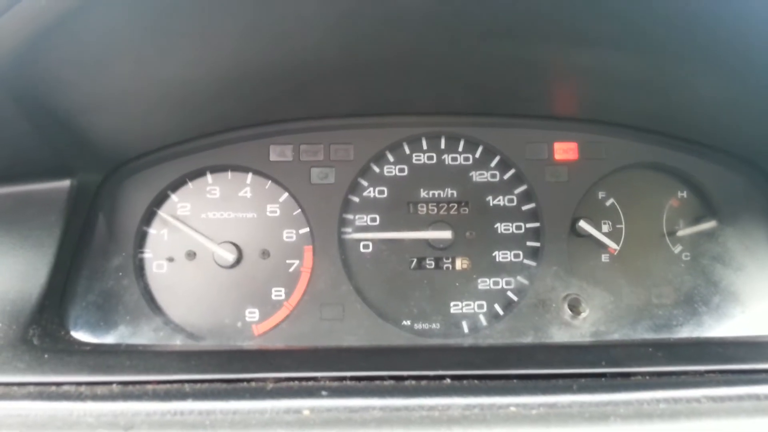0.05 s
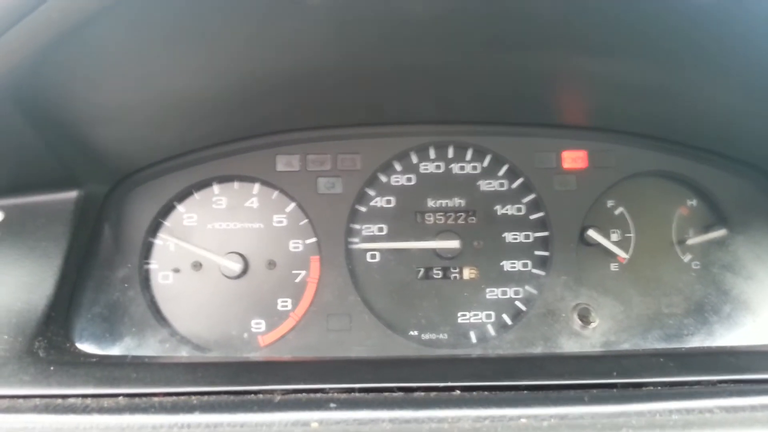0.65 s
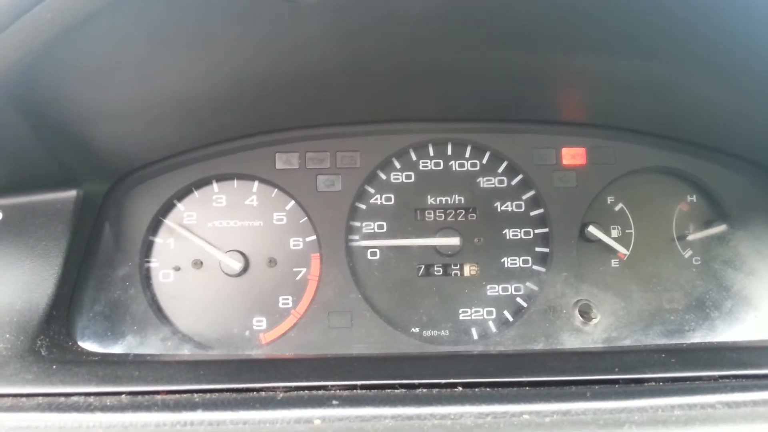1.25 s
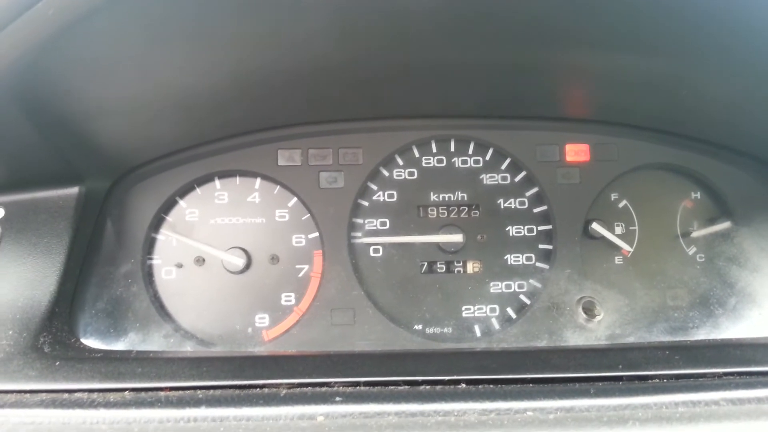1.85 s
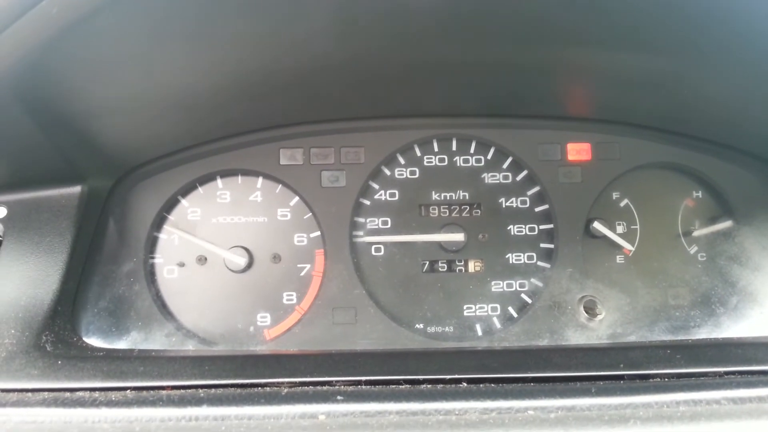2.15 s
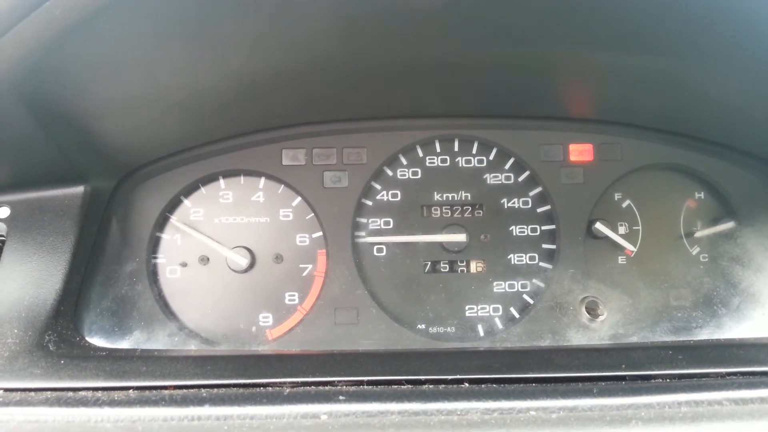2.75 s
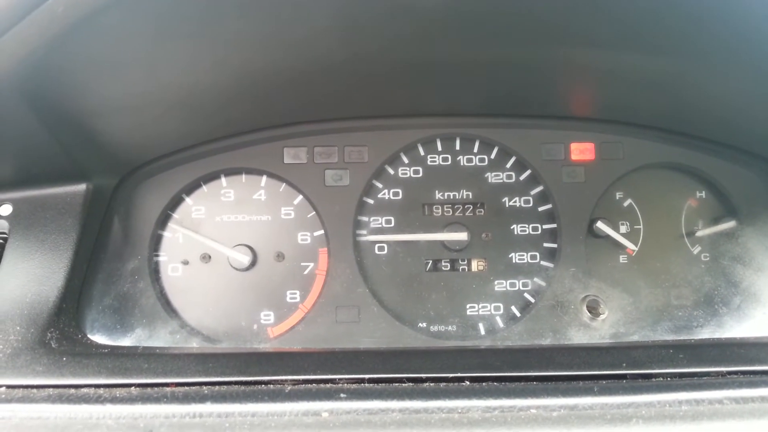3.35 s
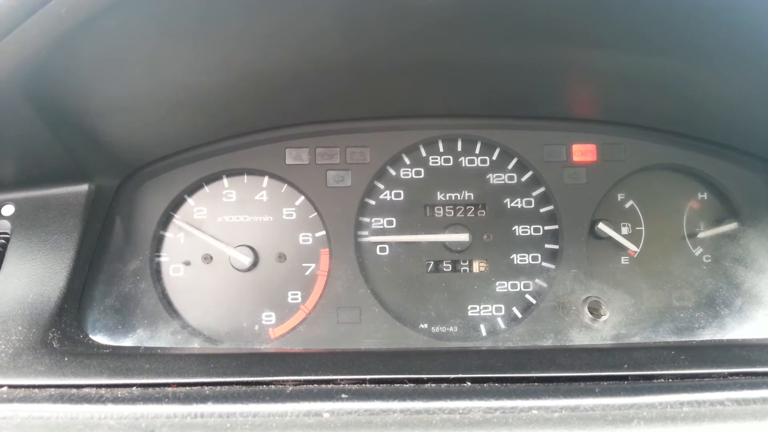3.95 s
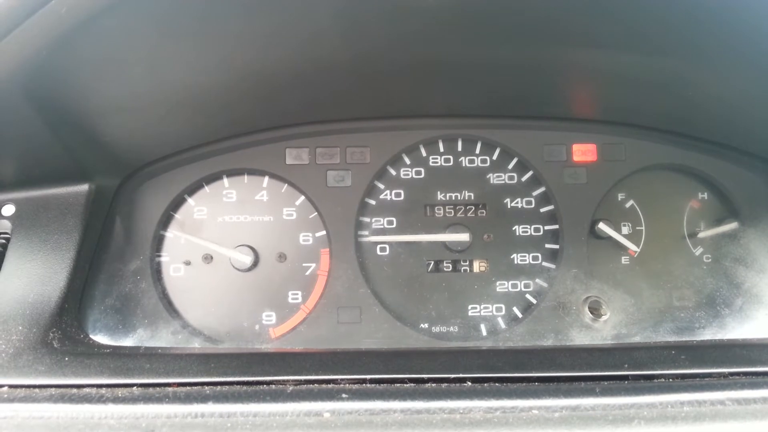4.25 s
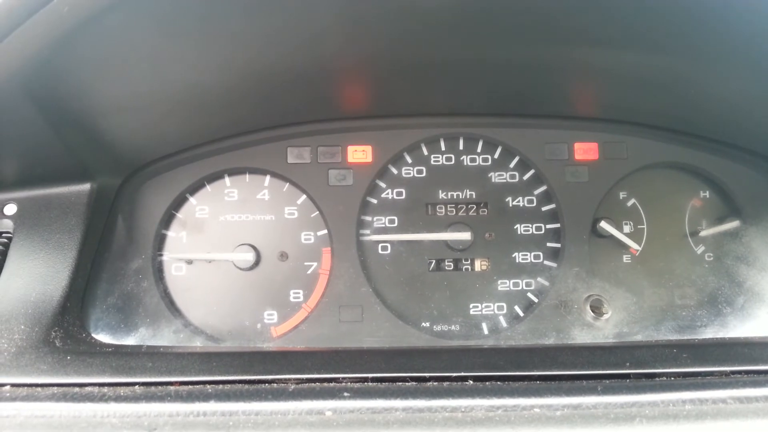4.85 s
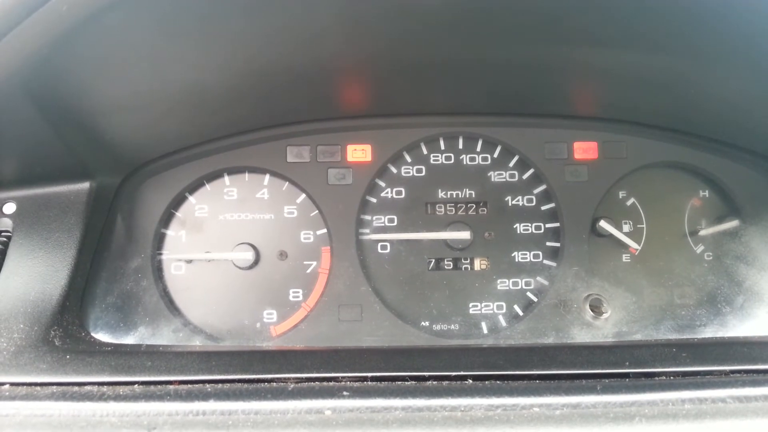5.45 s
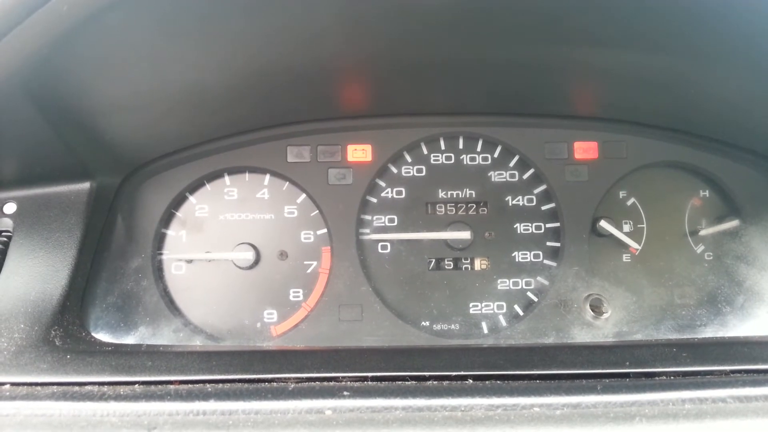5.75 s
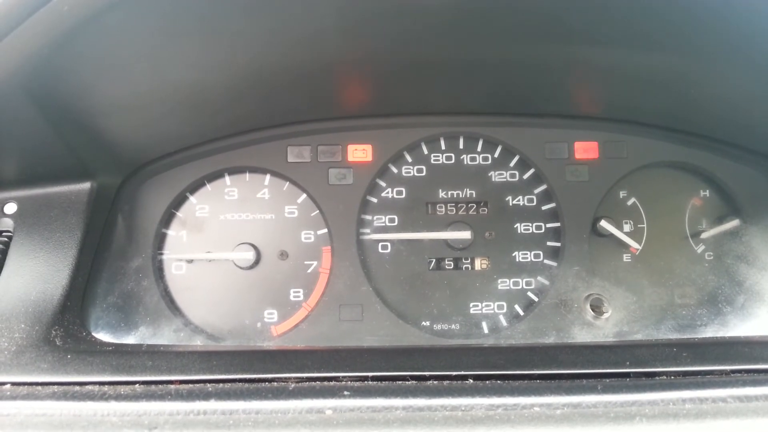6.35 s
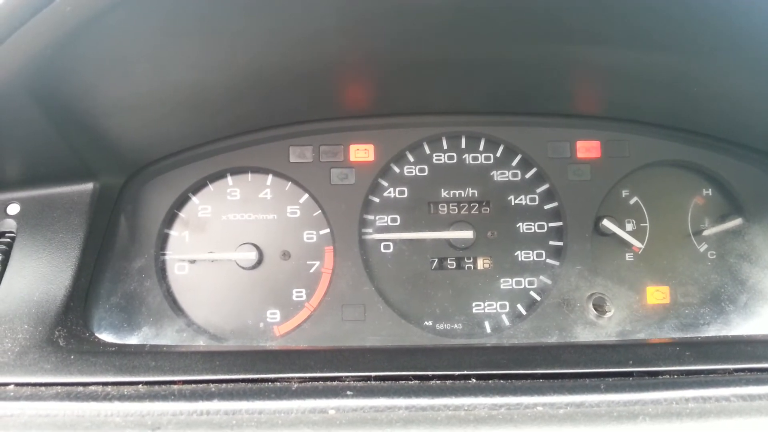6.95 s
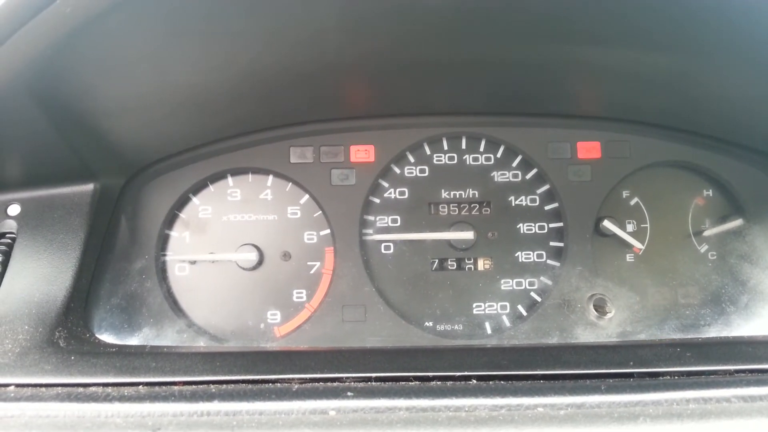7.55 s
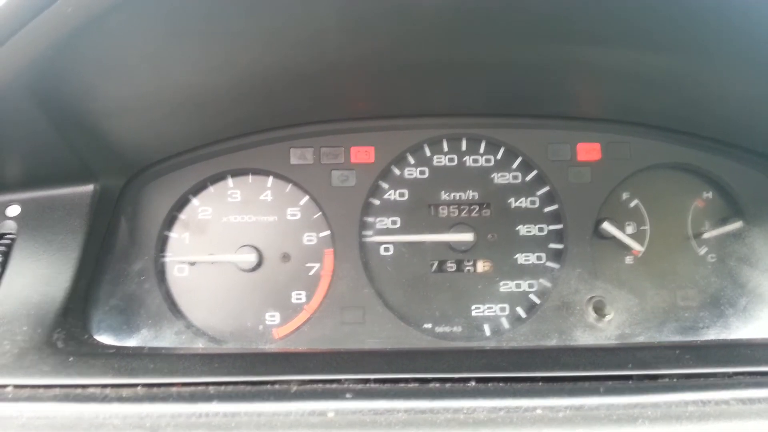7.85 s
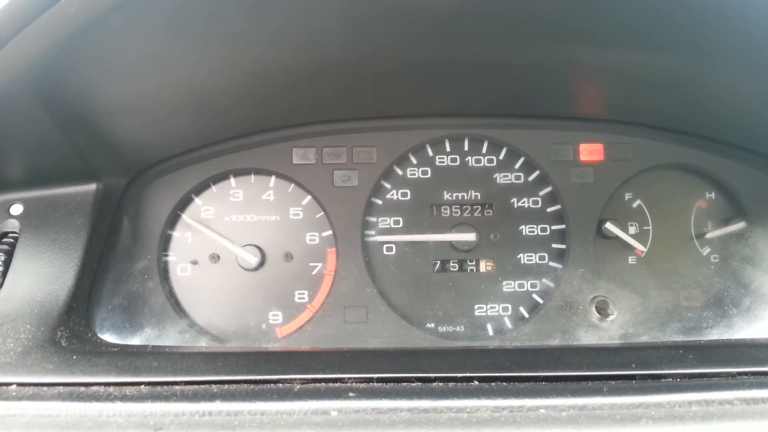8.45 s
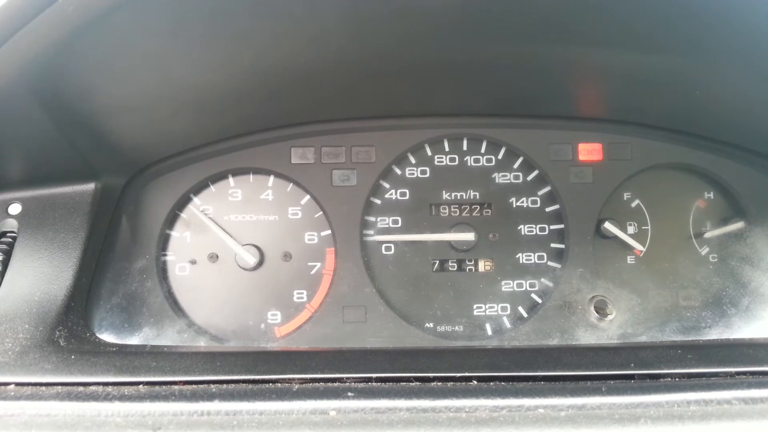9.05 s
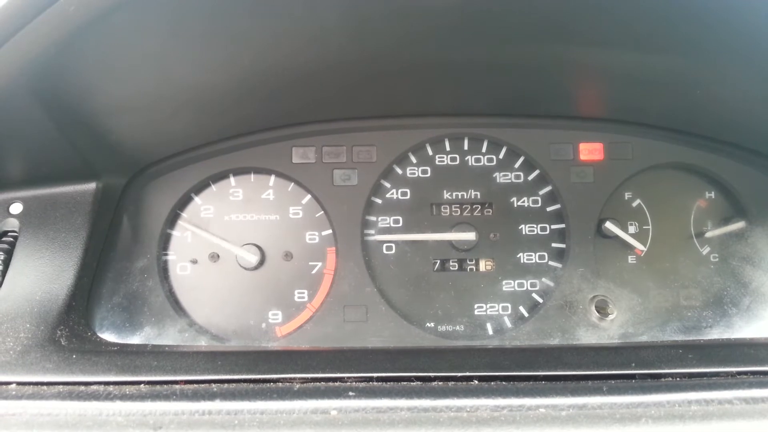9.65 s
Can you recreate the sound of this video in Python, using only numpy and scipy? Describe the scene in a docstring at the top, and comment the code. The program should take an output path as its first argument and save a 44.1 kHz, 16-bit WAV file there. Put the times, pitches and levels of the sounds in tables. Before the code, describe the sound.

Heard from the driver's seat of a small car, a four-cylinder engine idles unevenly, its low throb rising and sinking while keys tick faintly. It is switched off and shudders to rest. A key scrapes into the ignition and clacks round as other keys jingle. The starter whirrs with brief squeals, the engine catches, and the revs swell and drop again.

```python
"""Inside a small car, a four-cylinder engine idles unevenly, revving up and sinking as its fuel comes
and goes, while a hand fumbles with the keys. Switched off, it shudders to rest. The key scrapes into
the ignition lock and clacks round, and the other keys jingle against each other. Then the starter's
gears whirr, the engine catches, the key springs back, and the revs swell and sink again."""
import sys
import numpy as np
from scipy import signal
from scipy.fft import rfft, irfft, next_fast_len
from scipy.io import wavfile
from scipy.ndimage import uniform_filter1d

SR = 44100
rng = np.random.default_rng(int(sys.argv[2]) if len(sys.argv) > 2 else 0)


def store_pcm(level_fs):
    """Save levels as 16-bit WAV."""
    pcm = np.round(np.clip(level_fs, -1, 1) * 32767).astype(np.int16)
    wavfile.write(sys.argv[1], SR, np.atleast_2d(pcm).T)


N = 427329
T = np.arange(N) / SR

# Engine speed is counted in firings a second. The fuel cuts out at each peak of the idle:
# (time [s], speed [Hz], slowing [Hz/s])
FUEL_CUTS = [(0.155, 57.4, 43), (1.335, 57.3, 43.5), (2.535, 57.6, 45), (3.69, 57, 47)]
# the revs after the restart: (time [s], speed [Hz])
RESTART_REVS = [(8.1, 29.0), (8.15, 35), (8.3, 48.9), (8.5, 59.2), (8.7, 62.8), (8.9, 64.7), (9.08, 67.2),
                (9.4, 51.7), (9.69, 38.5)]
# the cabin's boom at 1, 2, 3 and 4 times the firing rate:
# (frequency [Hz], relative level coasting [dB], relative level with fuel [dB])
BOOM_1 = [(20, -63, -56), (31, -46, -57), (36.4, -49, -47), (41.7, -40, -39), (44, -47, -40),
          (49.4, -40, -39.5), (53, -48.5, -46), (56, -38.5, -41.5), (58, -39, -45), (61.6, -36, -39),
          (63.2, -32.5, -38), (65.6, -31, -31)]
BOOM_2 = [(40, -55, -46), (63.4, -44, -40.5), (73, -53, -48), (79.7, -37.5, -40.5), (88.5, -45, -39.5),
          (93.6, -36, -52), (99.3, -32.5, -44), (111.6, -32.5, -33), (116.5, -33.5, -34.5),
          (121.4, -30.5, -36.5), (129.4, -35.5, -45.5), (134, -44, -50)]
BOOM_3 = [(70, -51, -42), (95.5, -45.5, -47), (108.6, -44.5, -37), (122.5, -47, -37.5), (129.6, -39, -41),
          (140.8, -48.5, -41), (149, -67, -45), (164, -59, -70), (178, -57.5, -64), (198.6, -46.5, -44)]
BOOM_4 = [(125, -53, -50), (151, -64, -45.5), (170, -54, -56), (182, -57, -49.5), (205, -58, -51),
          (222, -47.5, -53), (241, -66.5, -60), (270, -54, -52)]
# weaker engine tones; the one near 12 is a belt's whine: (multiple of firing rate, relative level [dB])
OVERTONES = [(5, -59.5), (6, -58), (7, -59.5), (8, -62.5), (9, -66), (10, -66), (12.25, -60), (15, -68)]
# how the cabin passes those tones: (frequency [Hz], gain [dB])
CABIN_GAIN = [(60, 2), (160, 0), (205, 0.5), (250, -7), (295, 2.5), (350, 0), (385, -0.5), (440, -5.5),
              (520, -0.5), (720, -8.5), (920, -7), (1300, -8)]

# how things ring when struck: (frequency [Hz], relative level [dB], time to fade by 60 dB [s])
JOLT_RING = [(68, -47, .1), (102, -40, 0.095), (205, -46.5, 0.057), (300, -50, .04), (378, -49.5, 0.054)]  # the car's body, on uneven firings
CHUG_RING = [(45, -54, 0.11), (104, -36, 0.081), (330, -50, .04), (904, -63, 0.034)]  # the car's body, as the engine stops
LOCK_RING = [(440, -12.5, 0.11), (517, -9, 0.029), (668.5, -4, 0.099), (840, -11.5, 0.022),
             (1015, -8, 0.038), (1235, -7.5, 0.068), (1884, -14.5, 0.058)]  # the lock barrel and its cover
KEY_RING = [(5400, -3, 0.07), (6480, 0, 0.045), (6780, -2, 0.05), (7690, -11, 0.05), (9090, -4, 0.045),
            (9330, -4, 0.05), (10050, -9, 0.04), (12000, -6, 0.045), (12150, -5, .04), (13750, -11, .04)]
# pitches that metal casings boost: (frequency [Hz], width [Hz], boost [dB])
ENGINE_BLOCK = [(376, 34, 6), (963, 87, 3), (1373, 130, 4.5), (1784, 21, 8.5), (2270, 100, 2),
                (2786, 89, 4.5)]
STARTER_CASE = [(376, 27, 12.5), (710, 75, 5.5), (980, 60, 1), (1287, 66, 6.5), (1780, 37, 7)]

# the tone colour of each noise: (frequency [Hz], relative level [dB])
SHUDDER_COLOUR = [(20, -15), (35, 2), (60, -1.5), (100, 12), (135, 1.5), (170, -21), (300, -36)]
RUMBLE_COLOUR = [(88, -28), (150, -2.5), (167, -7.5), (200, -0.5), (238, -8), (301, -3), (377, -10),
                 (469, -15), (658, -13.5), (737, -22), (916, -12), (1040, -28.5), (1200, -28), (1560, -55),
                 (2640, -120)]
VALVE_COLOUR = [(470, -39), (800, -6.5), (916, -4.5), (1160, -3.5), (1390, -3.5), (1530, -6.5),
                (1820, -5.5), (2060, -7.5), (2730, -10.5), (3120, -12), (4400, -14), (6600, -13.5),
                (11900, -29.5), (13900, -38), (15000, -46)]
CABIN_COLOUR = [(15, -43.5), (25, -8), (44, 1), (81, -9), (125, -0.5), (158, -7.5), (286, -10.5),
                (354, -6.5), (673, -20), (1030, -15), (1120, -19.5), (1860, -28), (11500, -30),
                (13800, -26), (15000, -30.5)]
SNAP_COLOUR = [(1410, -36), (2400, -15), (3310, -9.5), (3580, -8.5), (3720, -9.5), (4470, -6.5), (5170, -6),
               (6760, -0.5), (7700, -7.5), (13800, -23), (15000, -31)]
COVER_COLOUR = [(150, -31.5), (250, -11), (300, -20), (410, -6.5), (544, -4.5), (673, 0), (921, -9.5),
                (1250, -8.5), (1560, -10.5), (1950, -17), (2310, -18), (2460, -14.5), (2800, -12.5),
                (3640, -42), (6160, -120)]
KEY_COLOUR = [(1500, -8), (3000, -9.5), (4200, -2.5), (6400, -1), (8000, -9), (10500, -13), (14000, -17.5),
              (16000, -39.5)]
RUSTLE_COLOUR = [(40, -12.5), (75, -13.5), (140, 0), (250, -6), (450, -5.5), (800, -9), (1500, -14),
                 (3000, -23), (6500, -21), (12000, -28.5), (15000, -40)]
SCRAPE_COLOUR = [(88, -42), (150, -16), (243, -20), (350, -3), (486, -5.5), (1160, -14.5), (1730, -11),
                 (1980, 1), (2450, -20), (5100, -20), (5610, -14.5), (10200, -25), (12100, -27),
                 (14200, -24), (15000, -80)]
GEAR_COLOUR = [(41, -27), (70, -8), (130, -5.5), (256, -3), (365, -5.5), (453, -10), (666, -13), (742, -12),
               (922, 0.5), (1030, -5.5), (1270, -2), (1580, -3), (1740, -7), (2190, -7.5), (2800, -24),
               (3640, -45), (6160, -120)]
BRUSH_COLOUR = [(1470, -19), (2500, -7), (2860, -4), (3200, -7), (4040, -6), (5370, -5.5), (6430, -1),
                (9500, -15), (10800, -21.5), (12200, -25), (14300, -37), (15000, -49)]
ROCKING_COLOUR = [(20, -6), (40, -1), (90, 4), (200, -7), (260, -3), (380, -1.5), (480, -12), (900, -33)]
# how noise spreads to the two sides: (frequency [Hz], likeness [-1 to 1], left minus right [dB])
STEREO = [(60, 0.92, -4.5), (130, 0.93, -2), (288, 0.81, -2.5), (450, 0.48, -1.5), (680, 0.41, -1),
          (1355, -0.51, -5), (2500, 0.15, 1.5), (4394, 0.024, 0.5), (7300, -0.053, -9), (15000, 0.31, 0)]

# the key catches in the lock: (time [s], relative snap level [dB], relative cover level [dB])
CLACKS = [(0.245, -46.5, -40), (1.153, -54, -44), (2.604, -27, -53), (2.621, -33.5, -41),
          (5.224, -42.5, -42.5), (5.278, -67, -58), (5.808, -53, -46), (5.826, -35, -32),
          (5.849, -40.5, -52), (5.888, -49, -38.5), (5.899, -30.5, -41), (5.919, -14.5, -19.5),
          (6.144, -45, -45.5), (6.217, -50, -50), (6.31, -47.5, -38), (6.332, -31, -40.5),
          (6.336, -14, -16.5), (6.377, -28.5, -37), (6.91, -64, -56), (6.955, -63.5, -54),
          (7.313, -78.5, -70), (7.648, -31, -41.5), (7.674, -36, -41), (7.784, -41, -47),
          (8.068, -29.5, -27)]
# springs sing after hard clacks: (time [s], frequency [Hz], level [dB], time to fade by 60 dB [s])
SPRINGS = [(5.921, 6270, -75, .5), (6.376, 1100, -51, .22), (6.337, 1092, -74, 2.2)]
# dull knocks of lock and starter:
# (time [s], relative level [dB], frequency [Hz], time to fade by 60 dB [s])
THUMPS = [(0.245, -37, 210, 0.072), (0.249, -35, 658, .06), (2.621, -31, 348, 0.083),
          (2.623, -32.5, 680, .1), (5.228, -36.5, 420, 0.068), (5.277, -44, 656, .06),
          (5.29, -46.5, 220, 0.15), (5.4, -37, 362, 0.062), (5.928, -28, 440, 0.1),
          (5.961, -27, 174.7, 0.1), (6.381, -39, 230, 0.084), (6.388, -33, 144, 0.092),
          (6.42, -38.5, 226, 0.074), (6.995, -49, 350, 0.086), (7.384, -35.5, 348, 0.084),
          (7.39, -32, 120, .08), (7.42, -33.5, 205, 0.18), (7.606, -31.5, 135, .18),
          (7.668, -34.5, 170, 0.11), (7.672, -31, 677, .12), (7.785, -32.5, 372, 0.2),
          (7.95, -28, 125, 0.076), (8.072, -31.5, 440, .08)]
# fingers slide over the key fob: (time [s], rise and fall time [s], level [dB])
FOB_RUBS = [(0.482, 0.047, -48), (1.112, 0.065, -52), (1.569, 0.1, -43), (1.918, 0.059, -57),
            (2.645, 0.042, -45.5)]
# keys touch each other: (time [s], relative tick level [dB], relative ring level [dB])
JINGLES = [(0.715, -43.5, -66), (0.797, -48, -54), (1.117, -42.5, -62), (1.152, -33.5, -54),
           (1.179, -41, -61), (1.899, -46, -65), (1.932, -48, -65), (2.07, -42, -72), (2.232, -42.5, -67),
           (2.604, -26, -32), (3.028, -44, -65), (5.385, -40, -46), (5.432, -52, -43), (5.46, -50, -45),
           (5.555, -39.5, -40), (5.572, -55, -48), (5.606, -63, -71), (5.651, -65, -63), (5.679, -57, -53),
           (5.715, -59, -54), (5.732, -60.5, -54), (5.744, -58, -53.5), (6.104, -63, -62),
           (6.123, -59, -64), (6.158, -55, -57), (6.173, -37, -41), (6.197, -57, -51), (6.215, -35.5, -40),
           (6.425, -40, -40), (6.467, -38.5, -43)]
# faint tones with the ignition on: (frequency [Hz], level [dB])
HUM_TONES = [(50, -70), (124, -80.5)]
# the hand grips the key: (time [s], rise and fall time [s], level [dB])
GRIPS = [(5.243, 0.017, -49.5), (5.424, 0.036, -52), (5.686, 0.012, -55.5), (5.828, 0.022, -44.5),
         (5.935, 0.026, -36.5), (6.066, 0.013, -66), (6.182, 0.036, -53), (6.428, 0.042, -55.5),
         (6.961, 0.062, -64.5)]
# the starter strains to squeeze the air in a cylinder:
# (time [s], rise [s], fall [s], relative gear level [dB], relative brush level [dB])
STRAINS = [(7.373, 0.0067, 0.022, -34.5, -36.5), (7.463, 0.14, 0.086, -38, -47.5),
           (7.668, 0.089, 0.029, -34, -36), (7.792, 0.0088, 0.053, -31.5, -36.5),
           (8.06, 0.038, 0.097, -42.5, -43)]
# the starter's gliding tones: (time [s], frequency [Hz], relative level [dB])
GEAR_GROWL = [(7.37, 300, -62), (7.41, 305.6, -52), (7.5, 310.7, -53), (7.56, 319.7, -52.5),
              (7.63, 300, -48), (7.68, 290.8, -45), (7.72, 270, -62), (7.77, 335.3, -69), (7.8, 327.6, -48),
              (7.85, 324.8, -59), (7.95, 345, -60)]  # the teeth sink in pitch under strain, then recover
FIRST_SQUEAL = [(7.56, 1830, -60), (7.61, 1797, -45), (7.645, 1750, -40), (7.69, 1740, -52)]  # the small drive gear sings on the first squeeze
SECOND_SQUEAL = [(7.768, 2090, -74), (7.778, 2000, -37), (7.801, 1980, -43), (7.825, 1760, -35.5),
                 (7.85, 1690, -48), (7.9, 1600, -71)]  # it squeals as it takes up the load
RUN_DOWN = [(8.15, 5300, -74), (8.26, 4920, -61), (8.33, 4650, -65), (8.37, 4430, -72), (8.44, 4120, -62),
            (8.58, 3680, -74)]  # the freed motor slows

# loudness of the engine's noises: (level at 50 firings a second [dB], gain per doubling of speed [dB],
# gain with fuel [dB], gain as it catches [dB], gain once switched off [dB])
SHUDDER_LEVELS = (-49.5, 1, 2, 5, 0)
RUMBLE_LEVELS = (-47, 3.5, 1.5, 6, -.5)
VALVE_LEVELS = (-51, 13.5, 2, 9.5, -1.5)
CYLINDER_PUSH = (.7, -.6, .3, -.4)  # each cylinder's push above or below the average
KEY_PITCHES = (0.982, 1.004, 0.993, 1.02)  # pitch factors of four keys of slightly different size
GROWL_TONES_DB = (-1.5, -10, -1.5, -2, -6.5)  # the growl's lowest tone and four overtones

OFF_S, LAST_CHUG_S, STOPPED_S, CATCH_S = 4.05, 4.72, 4.79, 7.945
CRAWL_HZ = 24.9  # below this speed the engine is barely turning


def from_db(db):
    """Turn decibels into a gain."""
    return np.exp(np.asarray(db) * (np.log(10) / 20))


def rms_one(x):
    """Scale to an average power of 1."""
    return x / np.sqrt(np.mean(x ** 2) + 1e-20)


def at_hz(table, hz, column=1):
    """Look up a table at any frequency, blending between its rows."""
    table = np.array(table)
    return np.interp(np.log(hz + 1e-9), np.log(table[:, 0]), table[:, column])


def drift(rate):
    """A random wander of about 1 either way, with `rate` new values a second."""
    knots = rng.standard_normal(8192)
    return rms_one(np.interp(T * rate, np.arange(len(knots)), knots))


def swell(s, rise_s, fall_s):
    """A smooth hump of height 1 at time s."""
    return np.exp(-np.minimum(((T - s) / np.where(T < s, rise_s, fall_s)) ** 2, 50))


def between(start, end, edge_s=.01):
    """1 between two times and 0 outside, with short ramps."""
    return np.clip((T - start) / edge_s, 0, 1) * np.clip((end - T) / edge_s, 0, 1)


def colour(pair, spectrum, peaks=()):
    """Give two signals a tone colour and spread them left and right, at power 1."""
    size = next_fast_len(N)
    hz = np.arange(size // 2 + 1) * SR / size + 1e-3
    edges = np.minimum(hz / spectrum[0][0], 1) * np.minimum(spectrum[-1][0] / hz, 1)
    boost_db = sum(db / (1 + (2 * (hz - centre) / width) ** 2) for centre, width, db in peaks)
    mid, side = rfft(pair, size) * from_db(at_hz(spectrum, hz) + boost_db) * edges ** 4
    alike = np.clip(at_hz(STEREO, hz), -1, 1)
    lean = from_db(at_hz(STEREO, hz, column=2) / 2)
    mid, side = mid * np.sqrt(1 + alike), side * np.sqrt(1 - alike)
    return rms_one(irfft([(mid + side) * lean, (mid - side) / lean], size)[:, :N])


def noise(spectrum, peaks=()):
    """Stereo noise with a tone colour, at power 1."""
    return colour(rng.standard_normal((2, N)), spectrum, peaks)


def strikes(times, levels_db):
    """One click for each contact."""
    out = np.zeros(N)
    out[np.round(np.array(times) * SR).astype(int)] = from_db(levels_db)
    return out + 1e-18


def dying(clicks, rise_s, t60, tail_db, tail_t60):
    """The loudness of blows: a quick rise, a fast fade and the cabin's short echo."""
    def fall(seconds):
        return signal.lfilter([1], [1, -from_db(-120 / (seconds * SR))], clicks ** 2)
    power = fall(t60) + from_db(tail_db) ** 2 * fall(tail_t60)
    lag = np.exp(-1 / (rise_s * SR))
    return signal.lfilter([1 - lag], [1, -lag], np.sqrt(power))


def ring(clicks, hz, t60):
    """Each click starts a pure tone that fades by 60 dB in t60 seconds."""
    decay, step = np.exp(-np.log(1000) / (t60 * SR)), 2 * np.pi * hz / SR
    return signal.lfilter([0, np.sin(step)], [1, -2 * decay * np.cos(step), decay * decay], clicks)


def engine_speed(ceiling_hz=65, climb_s=.41, brake_hz_per_s=58, catch_hz=19):
    """Firings a second: the revs climb and coast, friction stops them, and the restart lifts them."""
    surges = [np.where(T < s, ceiling_hz - (ceiling_hz - top) * np.exp((s - T) / climb_s),
                       top - slowing * (T - s)) for s, top, slowing in FUEL_CUTS]
    braking = brake_hz_per_s * (STOPPED_S - T)
    idle = np.maximum(np.minimum(np.max(surges, axis=0), braking), 0)
    restart = np.interp(T, *np.transpose([(CATCH_S - .02, 0), (CATCH_S, catch_hz), *RESTART_REVS]))
    return np.abs(uniform_filter1d(idle + restart, size=1764))


def doublings(rate):
    """How many times the speed has doubled from 50 firings a second."""
    return np.log2(np.maximum(rate, CRAWL_HZ) / 50)


def beats(firings, rate, length_s, steady, uneven_db):
    """A loudness that pulses on every firing, each time by a different amount, over a steady part."""
    strength = from_db(uneven_db * rng.standard_normal(2048))[firings.astype(int)]
    age = firings % 1 / np.maximum(rate, 1) / length_s
    pulses = steady + strength * age * np.exp(1 - age)
    return pulses / np.sqrt(uniform_filter1d(pulses ** 2, size=5292))


def boom(firings, rate, fuelled, waver_db=.83, ragged_db=3, fuel_lead_rad=1.9):
    """The engine's tones glide with its speed and boom where the cabin's air rings along."""
    out = 0
    cycles = firings + .008 * drift(22)  # the crankshaft runs slightly ahead or behind
    for multiple, levels in enumerate((BOOM_1, BOOM_2, BOOM_3, BOOM_4), 1):
        angle = 2 * np.pi * multiple * cycles
        # burning fuel pushes against the pistons' own swing, so the boom dips as one takes over
        coasting = from_db(at_hz(levels, multiple * rate)) * np.cos(angle)
        driven = from_db(at_hz(levels, multiple * rate, column=2)) * np.cos(angle + fuel_lead_rad)
        out += from_db(waver_db * drift(14)) * ((1 - fuelled) * coasting + fuelled * driven)
    speed_db = 3 * doublings(rate) - .5
    for multiple, db in OVERTONES:
        gain = from_db(db + speed_db + at_hz(CABIN_GAIN, multiple * rate) + ragged_db * drift(28))
        out += gain * np.sin(2 * np.pi * (multiple * cycles + rng.random()))
    return np.sqrt(2) * out


def jolts(firings, strokes, rate, fuelled, spread=.9, coasting_db=-9):
    """Unequal cylinders and patchy burning jolt the car, most as it revs up from low speed."""
    count = firings.astype(int)
    push = np.array(CYLINDER_PUSH)[count % 4] + spread * rng.uniform(-1, 1, 2048)[count]
    load_db = coasting_db * (1 - fuelled) - 3 * doublings(rate)
    blows = strokes * push * from_db(load_db) * np.minimum(rate / CRAWL_HZ, 1) ** 4 + 1e-18
    return sum(ring(blows * from_db(db), hz, t60) for hz, db, t60 in JOLT_RING)


def engine(regular=.25, fade_below_hz=18, catch_fade_s=.35):
    """Each firing booms, thuds and rattles the valves; switched off, the pistons chug on air alone."""
    rate = engine_speed()
    firings = np.cumsum(rate) / SR
    firings += 1 - np.interp(LAST_CHUG_S, T, firings) % 1  # one stroke lands on the last chug
    strokes = np.diff(np.floor(firings), prepend=np.floor(firings[0]))
    fuelled = uniform_filter1d((np.gradient(rate) > 0) * 1.0, size=2646)  # 1 while the revs rise
    caught = (T > STOPPED_S) * np.exp(-(np.maximum(T - CATCH_S, 0) / catch_fade_s) ** 2)
    turning = np.minimum(rate / fade_below_hz, 1)
    off = between(OFF_S, STOPPED_S, edge_s=.037)
    shudder, rumble, valves = [
        from_db(db + speed_db * doublings(rate) + fuel_db * fuelled + catch_db * caught + off_db * off)
        for db, speed_db, fuel_db, catch_db, off_db in (SHUDDER_LEVELS, RUMBLE_LEVELS, VALVE_LEVELS)]
    thuds = beats(firings, rate, length_s=.0084, steady=.54, uneven_db=.5)
    taps = beats(firings + .22, rate, length_s=.0088, steady=4.7, uneven_db=5.5)
    all_firing = swell(8.18, rise_s=.057, fall_s=.51)  # every cylinder joins in on the restart
    booming = turning * from_db(6 * all_firing - 3 * off) * boom(firings, rate, fuelled)
    unfired = strokes * off * turning ** 3
    chugs = sum(ring(unfired * from_db(db) + 1e-18, hz, t60) for hz, db, t60 in CHUG_RING)
    out = (booming + chugs + jolts(firings, strokes, rate, fuelled)) * from_db([[-1.8], [1.6]])
    out += shudder * colour(thuds * rng.standard_normal((2, N)), SHUDDER_COLOUR)
    # part of each thud is the same every time, part is random
    kicks = rms_one(strokes * from_db(.83 * drift(40)))
    knocks = regular * np.array([kicks, np.roll(kicks, 90)]) + thuds * rng.standard_normal((2, N))
    out += turning * rumble * colour(knocks, RUMBLE_COLOUR, ENGINE_BLOCK)
    return turning * out + np.sqrt(turning) * valves * taps * noise(VALVE_COLOUR, ENGINE_BLOCK)


def cabin(level_db=-72.5):
    """The faint, steady hush inside the car."""
    return from_db(level_db) * noise(CABIN_COLOUR)


def lock():
    """Catches snap in the lock and shake its plastic cover, which dies away fast; springs sing on."""
    times, snap_db, cover_db = np.transpose(CLACKS)
    snap = dying(strikes(times, snap_db + 4.5), rise_s=.001, t60=.051, tail_db=-29, tail_t60=.15)
    cover = dying(strikes(times, cover_db + 3), rise_s=.0037, t60=.065, tail_db=-17, tail_t60=.16)
    out = snap * from_db(2 * drift(900)) * noise(SNAP_COLOUR) + cover * noise(COVER_COLOUR)
    for k, (hz, db, t60) in enumerate(LOCK_RING):
        blows = strikes(times + .001, cover_db + db + rng.standard_normal(len(times)))
        out += (-1) ** k * ring(blows, hz, t60) * from_db([[-1], [1]])
    return out + sum(ring(strikes([s], [db]), hz, t60) for s, hz, db, t60 in SPRINGS)


def steering_column(bounce_s=.033, bounce_loss_db=12.5, overtone_db=-9, cutoff_hz=600):
    """Soft knocks bounce twice and ring the column with a low tone and a weaker, higher one."""
    out, bounce = 0, np.arange(3)
    for s, db, hz, t60 in THUMPS:
        blows = strikes(s + bounce_s * bounce, db + 2.5 - bounce_loss_db * bounce)
        out += ring(blows, hz, t60) - from_db(overtone_db) * ring(blows, 1.7 * hz, .5 * t60)
    muffle = signal.butter(2, cutoff_hz, fs=SR, output="sos")
    return signal.sosfilt(muffle, out) * from_db([[-1.5], [1.5]])


def keys(contacts=4, gap_s=.0036, loss_db=4, scatter_db=5, clink_width_hz=450):
    """Fingers brush the fob; keys touch in a quick run of ticks, each tick ringing one key."""
    touches, tick_db, ring_db = np.transpose(JINGLES)
    contact = np.arange(contacts)
    gaps = gap_s * rng.uniform(.3, 1.5, (len(touches), contacts)) * (contact > 0)
    times = (touches[:, None] + np.cumsum(gaps, axis=1)).ravel()
    tick_db, ring_db = [(db[:, None] - loss_db * contact).ravel() for db in (tick_db, ring_db)]
    tick = dying(strikes(times, tick_db + 1), rise_s=.0002, t60=.012, tail_db=-12, tail_t60=.12)
    rub = sum(from_db(db) * swell(s, length, length) for s, length, db in FOB_RUBS)
    metal = noise(KEY_COLOUR, [(hz, clink_width_hz, 4 * from_db(db)) for hz, db, _ in KEY_RING])
    out = (tick * metal + rub * noise(KEY_COLOUR)) * from_db(2 * drift(400))
    for key, pitch in enumerate(KEY_PITCHES):
        struck = np.arange(len(times)) % len(KEY_PITCHES) == key
        for hz, db, t60 in KEY_RING:
            chance_db = scatter_db * rng.standard_normal((struck.sum(), 2))
            sides = [ring(strikes(times[struck], ring_db[struck] + db + luck), pitch * hz, t60)
                     for luck in chance_db.T]
            out += rng.choice([-1, 1], (2, 1)) * from_db([[-7.5], [-4.5]]) * np.array(sides)
    return out


def ignition_hum():
    """A faint hum from when the ignition comes on until the starter turns."""
    on = np.interp(T, [5.2, 5.25, 7.4, 7.5], [0, 1, 1, 0])
    hum = sum(from_db(db) * np.sin(2 * np.pi * hz * T) for hz, db in HUM_TONES)
    return on * hum * from_db(1.5 * drift(11))


def hand(fumble_db=-66, slide_db=-36.5):
    """A sleeve rustles with each grip, and the key scrapes along the pins of its slot."""
    grips = sum(from_db(db) * swell(s, length, length) for s, length, db in GRIPS)
    moving = from_db(fumble_db) * between(5.21, 6.5) + grips
    sliding = from_db(slide_db) * swell(5.408, rise_s=.0095, fall_s=.036)
    rustle = moving * from_db(1.6 * drift(140)) * noise(RUSTLE_COLOUR)
    return rustle + sliding * from_db(2 * drift(500)) * noise(SCRAPE_COLOUR)


def starter(engage_s=7.363, freed_s=8.01, wobble=.02, grit=1.7):
    """Gear teeth knock in their case and the motor's sliding brushes hiss, louder with each strain."""
    gear_strain = sum(from_db(db) * swell(s, rise, fall) for s, rise, fall, db, _ in STRAINS)
    brush_strain = sum(from_db(db) * swell(s, rise, fall) for s, rise, fall, _, db in STRAINS)
    engaged = np.clip((T - engage_s) / .021, 0, 1)
    free_for_s = np.maximum(T - freed_s, 0)  # once freed, the gears fade faster than the brushes
    gears = from_db(-.5) * np.hypot(gear_strain, from_db(-45 - 80 * free_for_s))
    brushes = from_db(4.5) * np.hypot(brush_strain, from_db(-47.5 - 21 * free_for_s))
    times, tooth_hz, _ = np.transpose(GEAR_GROWL)
    teeth = np.cumsum(np.interp(T, times, tooth_hz) * (1 + wobble * drift(90))) / SR
    knocks = rms_one(np.diff(np.floor(teeth), prepend=0) * from_db(2.8 * drift(300)))
    grinding = np.array([knocks, np.roll(knocks, 37)]) + grit * rng.standard_normal((2, N))
    whirr = colour(grinding, GEAR_COLOUR, STARTER_CASE)
    rattle = from_db(1.4 * drift(150) + 1.33 * drift(35))
    return engaged * rattle * (gears * whirr + brushes * noise(BRUSH_COLOUR))


def gear_growl(wobble=.014, flutter_db=4.5):
    """The starter's teeth meet fast enough to make a tone, whose overtones each flutter on their own."""
    times, hz, db = np.transpose(GEAR_GROWL)
    teeth = np.cumsum(np.interp(T, times, hz) * (1 + wobble * drift(90))) / SR
    tones = sum(from_db(level + flutter_db * drift(45)) * np.sin(2 * np.pi * (k * teeth + rng.random()))
                for k, level in enumerate(GROWL_TONES_DB, 1))
    loudness = from_db(np.interp(T, times, db, left=-150, right=-150))
    return np.sqrt(2) * loudness * tones * from_db([[-1.5], [1.5]])


def engine_rocking(level_db=-45.5):
    """Turned over by the starter, the engine rocks on its mounts."""
    cranked = between(7.385, 7.97, edge_s=.014)
    return cranked * from_db(level_db + 2 * drift(40)) * noise(ROCKING_COLOUR)


def whine(glide, wobble, flutter_db):
    """A spinning part of the starter sings a gliding, slightly rough tone."""
    times, hz, db = np.transpose(glide)
    cycles = np.cumsum(np.interp(T, times, hz) * (1 + wobble * drift(600))) / SR
    level_db = np.interp(T, times, db, left=-150, right=-150) + flutter_db * drift(120)
    return from_db(level_db) * np.sqrt(2) * np.sin(2 * np.pi * cycles)


def starter_whines():
    """The drive gear squeals twice under load, then the freed motor whines down."""
    squeals = sum(whine(glide, wobble=.045, flutter_db=2) for glide in (FIRST_SQUEAL, SECOND_SQUEAL))
    return squeals + whine(RUN_DOWN, wobble=.014, flutter_db=4)


def scene():
    """Everything as heard from the driver's seat."""
    machinery = engine() + starter() + starter_whines() + engine_rocking() + gear_growl()
    return machinery + lock() + hand() + steering_column() + keys() + cabin() + ignition_hum()


def record(dry, cutoff_hz=14950):
    """Round off the loudest peaks and cut the highest treble."""
    return signal.sosfilt(signal.ellip(10, .2, 70, cutoff_hz, fs=SR, output="sos"), np.tanh(dry))


dry = scene()
out = record(dry)
store_pcm(out)
```